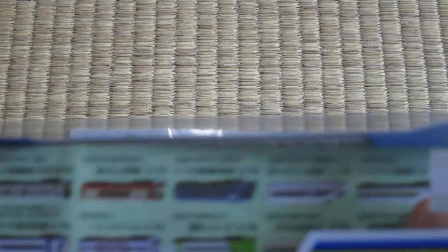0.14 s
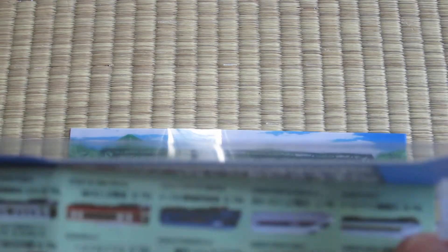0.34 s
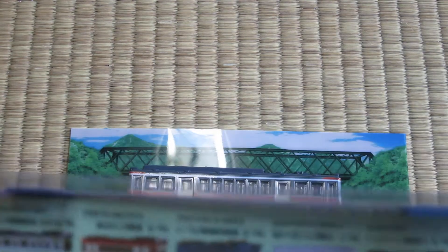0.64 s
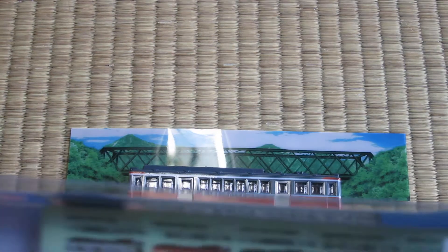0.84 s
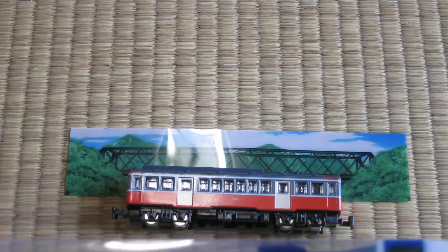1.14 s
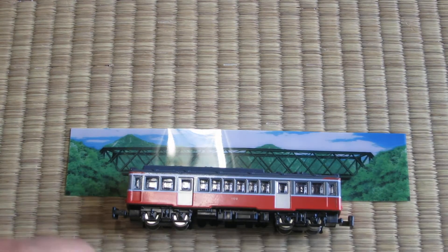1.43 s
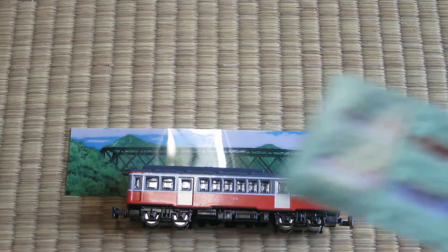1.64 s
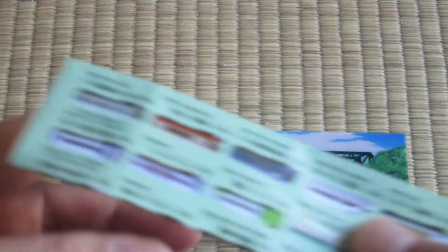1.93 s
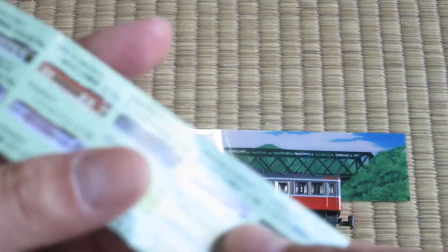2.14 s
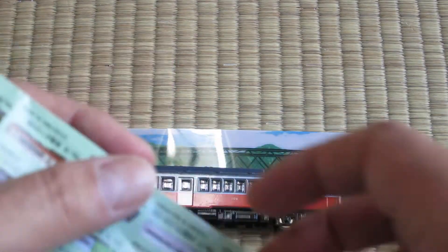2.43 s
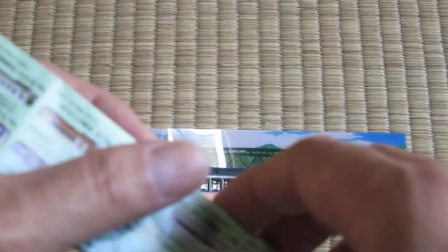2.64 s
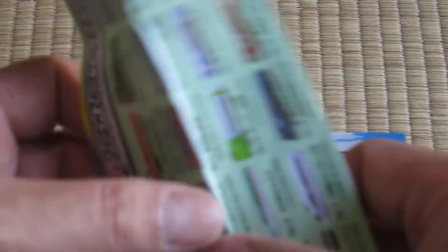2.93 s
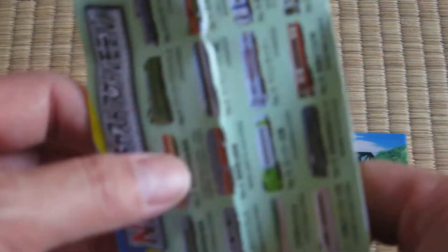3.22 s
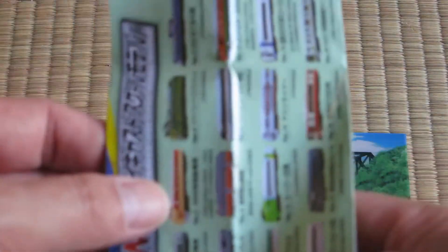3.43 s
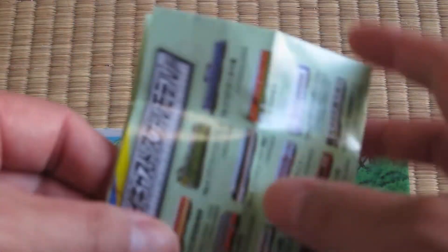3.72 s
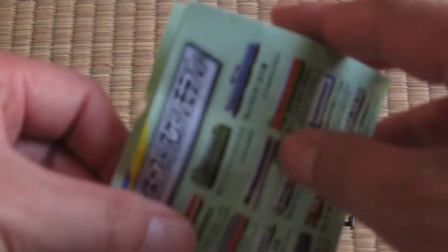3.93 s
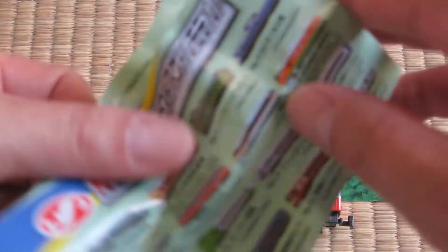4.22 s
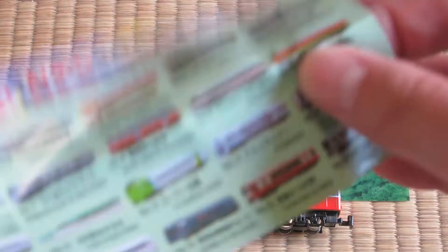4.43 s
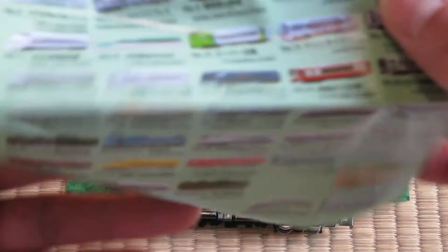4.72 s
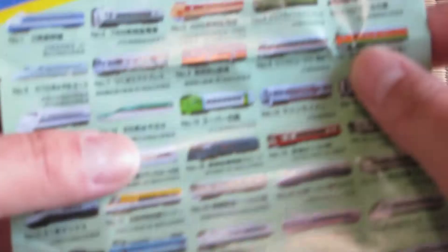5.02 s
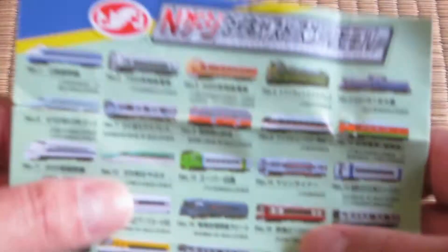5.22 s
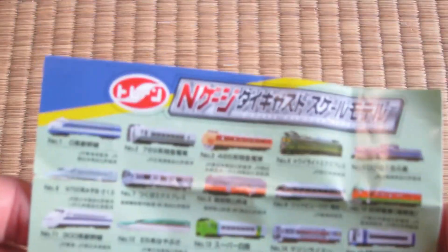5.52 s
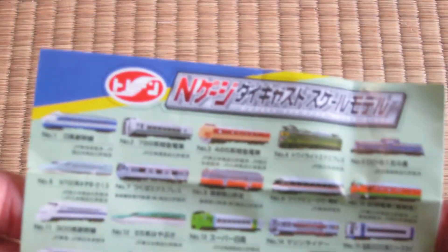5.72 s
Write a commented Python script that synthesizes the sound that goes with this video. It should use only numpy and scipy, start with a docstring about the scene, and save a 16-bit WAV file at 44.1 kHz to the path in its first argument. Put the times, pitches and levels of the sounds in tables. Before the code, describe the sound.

Close-up handling: a thin box rattles and is set down, then a creased paper sheet hisses, crinkles and crackles open in a quiet room.

```python
"""Unfolding a glossy leaflet

Hands close to a small stereo microphone slide a folded leaflet out of a thin box, put the box down and unfold the sheet.
Sliding is a dense rain of tiny random slips: in the box it rings the hollow walls, on the open sheet it hisses bright.
Knocks, dull tocks off to the right and crease snaps are short bursts of noise that ring resonances.
A quiet matted room hums underneath and adds a short dull tail."""
import sys
import numpy as np
from scipy import signal
from scipy.fft import rfft, irfft
from scipy.io import wavfile
from scipy.ndimage import uniform_filter1d

SR = 44100
rng = np.random.default_rng(int(sys.argv[2]) if len(sys.argv) > 2 else 0)


def master(y):
    """Save y as 16-bit WAV."""
    cut = np.clip(np.atleast_2d(y).T, -1, 1)
    pcm = np.round(cut * 32767)  # scale
    wavfile.write(sys.argv[1], SR, pcm.astype(np.int16))


N = 259043

# bright cracking resonances of box and creases: (frequency [Hz], width [Hz], relative level [dB])
CRACK_MODES = [(4330, 880, 9), (6800, 7900, 11.5), (10300, 1500, -33)]

WIDE_HZ, WIDE_DB = 8600, -6  # above this the two ports hear partly different sound
FADE_DB = 20  # a stroke gains this much over its rise and loses it over its fall
SCATTER_DB = -0.5  # each blow lands a little aside
SOFTER_PER_DB = 0.16  # dB by which the rise lengthens for each dB that a blow is weaker than -20 dB
RISE_SHARE = 0.29  # part of the contact time that adds to the rise
TINT_DB = 3  # spread of each resonance from blow to blow


def undb(db):
    """Turn decibels into gain."""
    return 10 ** (np.asarray(db) / 20)


def unit(x):
    """Scale to an rms of 1."""
    return x / np.sqrt(np.mean(x ** 2))


def response(modes):
    """Ring of a body: steep resonances whose powers add, made causal through the cepstrum of the log gain."""
    f = np.maximum(np.arange(1025) * SR / 2048, 1)
    power = 0
    for hz, width, db in modes:
        detuning = (f ** 2 - hz ** 2) / (f * width)
        power = power + undb(2 * db) / (1 + detuning ** 2) ** 2
    cepstrum = irfft(np.log(power) / 2)
    # folding the second half onto the first leaves no sound before the blow
    fold = np.r_[1, np.full(1023, 2.), 1, np.zeros(1023)]
    return irfft(np.exp(rfft(cepstrum * fold)))


def ring(x, modes):
    """Pass both channels through a ringing body."""
    return signal.oaconvolve(x, response(modes)[None], axes=1)[:, :x.shape[1]]


def ports(mid, side, wide_db=-40):
    """Left and right: alike in the bass unless the source is wide, partly unlike in the treble."""
    high_pass = signal.butter(2, WIDE_HZ, "high", fs=SR, output="sos")
    side = undb(wide_db) * side + undb(WIDE_DB) * signal.sosfilt(high_pass, side)
    return np.array([mid + side, mid - side])


def panned(x, pan_db):
    """Share a sound between the two ports; pan_db is left minus right."""
    return x * undb(np.array([pan_db, -pan_db]).reshape(2, -1) / 2)


def walk(rate):
    """Wander between random levels, rate of them per second; spread near 1."""
    k = int(SR / rate)
    levels = np.repeat(rng.standard_normal(N // k + 1), k)
    return 1.2 * uniform_filter1d(levels, k)[:N]


def slips(per_s, spread_db, flutter_db, flutter_rate):
    """Force of tiny random slips of uneven but bounded size over a steady floor, coming in flurries."""
    size_db = spread_db * np.minimum(rng.exponential(size=N), 3.5)
    size = undb(size_db) * (rng.random(N) < per_s / SR)
    return (uniform_filter1d(size, size=12) + 0.21) * undb(flutter_db * walk(flutter_rate))


def curve(table):
    """Columns of a table at every sample, and a gate that is open inside its time span."""
    s, *columns = np.transpose(table)
    t = np.arange(N) / SR
    gate = np.clip(np.minimum(t - s[0] + .02, s[-1] + .02 - t) / .04, 0, 1)
    return gate, [np.interp(t, s, c) for c in columns]


def strokes(table):
    """Gain of each layer over time: every stroke swells and fades evenly in dB, and their powers add."""
    t = np.arange(N) / SR
    shape = []
    for s, rise, fall, *_ in table:
        distance = np.maximum((s - t) / rise, (t - s) / fall)
        shape.append(undb(-2 * FADE_DB * distance))  # twice the dB: power
    return np.sqrt(undb(2 * np.array(table)[:, 3:].T) @ shape)


def patchy(force, modes, patchy_db, rate, wide_db=-40, gains=1):
    """Noise scaled by the force drives each resonance apart, so each swells and fades on its own."""
    parts = []
    for mode in modes:
        noise = rng.standard_normal((2, N))
        drive = ports(*(force * undb(patchy_db * walk(rate)) * noise), wide_db)
        parts.append(ring(drive, [mode]))
    parts = np.array(parts)
    gains = np.reshape(gains, (-1, 1, N) if np.ndim(gains) else ())
    return np.sum(parts * gains, axis=0) / np.std(parts.sum(0))


def bursts(rows, layers, tail, creak, creak_ms, rise_ms, pan_db, wide_db=-40):
    """Each row is a noise burst: a creak builds up, gives way, dies and rings every layer to its own peak."""
    lead, length = 600, 3600  # samples of creak before the blow, and of the whole burst
    out = np.zeros((2, N + length))
    t_ms = (np.arange(length) - lead) * 1000 / SR
    noises = rng.standard_normal((len(rows), 2, length))
    tints = rng.standard_normal((len(rows), 8))
    for row, noise, tint in zip(rows, noises, tints):
        s, *layer_db, ms = row
        bodies = layers(row)
        strongest_db = max(layer_db[:len(bodies)])
        rise = rise_ms * undb(-SOFTER_PER_DB * (strongest_db + 20)) + RISE_SHARE * ms
        after = np.maximum(t_ms - rise, 0) / max(ms, .3)
        build_up = creak * np.exp(np.minimum(t_ms, 0) / creak_ms)
        swell = np.maximum(np.clip(t_ms / rise, 0, 1), build_up)
        push = ports(*noise, wide_db) * swell
        hit = 0
        for k, (modes, db) in enumerate(zip(bodies, layer_db)):
            # later layers in the list die sooner
            fall = np.exp(-after * (1 + 0.24 * k)) + tail * np.exp(-after / 4)
            # every blow weights the resonances anew
            tinted = [(hz, width, level + TINT_DB * z) for (hz, width, level), z in zip(modes, tint)]
            part = ring(push * fall, tinted)
            hit = hit + undb(db) * part / np.abs(part.mean(0)).max()
        start = int(s * SR)
        out[:, start:start + length] += panned(hit, pan_db + SCATTER_DB * tint[-1])
    return out[:, lead:N + lead]


def hum():
    """Room hum and microphone hiss are shaped noise, plus one narrow band, all wavering a little."""
    # spectrum of hum and hiss: (frequency [Hz], relative level per Hz [dB])
    hum_spectrum = np.array([(18, -21), (30, -9.5), (52, -2), (79, -10.5), (124, -2), (259, -6.5),
                             (374, -11.5), (415, -7), (600, -12.5), (760, -13), (937, -12), (2060, -20),
                             (6900, -31), (16000, -37)])
    # likeness of the two ports: (frequency [Hz], left-right correlation [-1 to 1])
    hum_likeness = np.array([(30, 0.44), (60, 0.18), (290, -0.56), (1410, -0.61), (3100, -0.38),
                             (6820, 0.036), (15000, -0.56)])
    # the narrow band: (frequency [Hz], width [Hz], relative level [dB])
    band_modes = [(1282, 180, 0)]
    hum_db, band_db = -47, -59
    log_f = np.log(np.maximum(np.arange(N // 2 + 1) * SR / N, 1))
    gain = undb(np.interp(log_f, np.log(hum_spectrum[:, 0]), hum_spectrum[:, 1]))
    alike = np.interp(log_f, np.log(hum_likeness[:, 0]), hum_likeness[:, 1])
    alike = np.clip(alike, -.95, .95)
    noise = rng.standard_normal((2, N)) * undb(2.1 * walk(5.9))
    mid, side = rfft(noise) * gain * np.sqrt([1 + alike, 1 - alike])
    wide_hum = unit(irfft(np.array([mid + side, mid - side]), N))
    band = unit(ring(rng.standard_normal((2, N)), band_modes))
    return undb(hum_db) * wide_hum + band * undb(band_db + 0.92 * walk(4.9))


def box():
    """The sheet's slips ring the hollow box as it slides out; the box also gets knocked and set down."""
    # sheet dragging out: (time [s], level in the walls [dB], level of the hiss [dB], level of the boom [dB])
    drag_levels = [(0.0, -42.5, -51, -47), (0.11, -35.5, -38, -40), (0.285, -57, -61, -63),
                   (0.387, -49, -51.5, -54), (0.535, -56.5, -54, -51.5), (0.603, -43, -45, -55),
                   (0.66, -52, -50.5, -47), (0.726, -46.5, -49, -52), (0.848, -39, -41, -58),
                   (0.974, -37.5, -37.5, -53.5), (1.025, -28, -31.5, -45), (1.074, -24.5, -27.5, -35.5),
                   (1.173, -36, -36.5, -56), (1.231, -51, -57, -53), (1.3, -71, -78, -62)]
    # box shuffling on the mat once set down:
    # (time of strongest [s], rise [s], fall [s], walls [dB], hiss [dB], boom [dB])
    mat_shuffles = [(1.4, 0.032, .03, -75, -56, -75), (1.447, 0.011, 0.1, -43, -54, -45.5),
                    (1.668, 0.024, 0.23, -49.5, -59, -47.5), (1.752, 0.11, 0.037, -44.5, -68, -44.5)]
    # knocks and slips: (time [s], boom peak [dB], walls peak [dB], crack peak [dB], contact [ms])
    knock_rows = [(0.014, -60, -40, -34.5, 4.1), (0.05, -31, -19, -24.5, 3.7), (0.085, -61, -32, -23, 3.1),
                  (0.098, -31, -18, -21.5, 3.4), (0.112, -27.5, -22, -42, 1.5),
                  (0.126, -39.5, -38, -26.5, 8.7), (0.175, -60, -45, -34, 3.5), (0.554, -39, -28, -33, 3),
                  (0.595, -28, -16, -15.5, 0.63), (0.702, -51, -34.5, -35.5, 2.5),
                  (0.748, -41, -36, -44, 1.6), (0.769, -61, -33, -32, 5.1), (0.843, -32, -36, -29, 2.7),
                  (0.949, -42, -26, -42, 2.3), (1.03, -40, -22, -24, 2), (1.035, -34, -13, -13, 2.2),
                  (1.043, -42, -13, -17, 6.1), (1.06, -27, -10, -8, 1.8), (1.072, -25, -4, -6.5, 2.3),
                  (1.079, -16, -27, -7, 2.5), (1.101, -28.5, -4, -5.5, 1.9), (1.112, -29, -13.5, -25, 4),
                  (1.165, -57, -36, -18.5, 4.1), (1.195, -58, -24.5, -18, 1.46),
                  (1.251, -37.5, -36, -32, 1.2), (1.272, -60, -60, -34.5, 1.4), (1.347, -69, -39.5, -62, 2),
                  (1.435, -36, -20.5, -23.5, 5.5), (1.457, -50, -28, -32, 1.4), (1.496, -60, -37, -43, 3.8),
                  (1.519, -56, -55, -46, 2.7), (1.642, -65, -51, -41, 2.1), (1.658, -35, -16.5, -24, 3.6),
                  (1.665, -45, -25, -36, 3.8), (1.679, -33, -52, -48, 3.1), (1.71, -35, -26.5, -32, 2.5),
                  (1.732, -40, -25.5, -33.5, 3.8), (1.782, -59, -46, -46, 2.6), (1.89, -63, -48, -43, 3.3)]
    # low thud of the box in the hand: (time [s], peak [dB], contact [ms])
    thud_rows = [(.118, -34, 15)]
    # resonances of the box walls: (frequency [Hz], width [Hz], relative level [dB])
    wall_modes = [(916, 242, 8), (1500, 470, -2.5), (1993, 153, -3), (2310, 330, -4), (2975, 620, -11.5),
                  (1550, 810, -3), (636, 380, -22)]
    # bright resonances of the sliding hiss: (frequency [Hz], width [Hz], relative level [dB])
    squeak_modes = [(3240, 170, 12), (4405, 82, 11.5), (5030, 160, 8.5), (3960, 4300, 5.5),
                    (5640, 9700, 0.5), (8000, 1700, 0.5), (10500, 4100, -3)]
    # low resonances of the hollow box: (frequency [Hz], width [Hz], relative level [dB])
    boom_modes = [(271, 74, -6.5), (327, 264, -5)]
    # resonance of the thud: (frequency [Hz], width [Hz], relative level [dB])
    thud_modes = [(154, 35, 0)]
    drag_pan_db, knock_pan_db = 0, -0.3  # left minus right
    gate, layer_db = curve(drag_levels)
    gains = gate * undb(layer_db) + strokes(mat_shuffles)
    scrape = slips(2500, 2.8, 1.5, 59.35)
    drag = 0
    for gain, modes in zip(gains, (wall_modes, squeak_modes, boom_modes)):
        drag = drag + gain * patchy(scrape, modes, patchy_db=2.2, rate=25.27)
    knocks = bursts(knock_rows, lambda row: (boom_modes, wall_modes, CRACK_MODES), tail=0.38,
                    creak=0.022, creak_ms=2.0, rise_ms=0.49, pan_db=knock_pan_db)
    thuds = bursts(thud_rows, lambda row: (thud_modes,), tail=0.087,
                   creak=.02, creak_ms=1.5, rise_ms=4.1, pan_db=knock_pan_db)
    return panned(drag, drag_pan_db) + knocks + thuds


def tocks():
    """Dull tocks off to the right: short noise bursts ring a few middle resonances."""
    # the blows: (time [s], peak [dB], contact [ms])
    tock_rows = [(0.486, -26, 3.5), (1.282, -32.5, 1.5), (1.795, -23.5, 1.7), (2.653, -29, 4.3),
                 (2.903, -44, 2.8), (3.28, -43, 4)]
    # resonances: (frequency [Hz], width [Hz], relative level [dB])
    tock_modes = [(1334, 600, 22), (1730, 1500, -22), (2240, 1160, -29)]
    return bursts(tock_rows, lambda row: (tock_modes,), tail=0.11,
                  creak=.03, creak_ms=1.5, rise_ms=0.19, pan_db=-14.5)


def stroked_sheet(flap_modes):
    """Slips of skin hiss on glossy paper; slower buckling of the whole sheet rustles and flaps."""
    # finger strokes: (time of strongest [s], rise [s], fall [s], sheen [dB], scuff [dB], rustle [dB],
    # tilt of the sheen [dB per octave])
    finger_strokes = [(2.1, 0.026, 0.21, -51.5, -63, -65, -3), (2.175, 0.086, 0.34, -48, -53, -56, 10),
                      (2.444, 0.026, .035, -49.5, -51, -54, -7), (2.53, 0.046, 0.27, -51, -51, -58, -5),
                      (2.72, 0.064, 0.14, -41.5, -41, -48.5, -1), (2.79, 0.16, .07, -45, -61, -50, 0),
                      (2.878, 0.017, 0.083, -45, -47, -53, 12), (2.927, 0.053, 0.049, -36, -55, -44, 5),
                      (3.03, 0.16, 0.11, -46.5, -53, -49, 7), (3.16, 0.077, 0.082, -45.5, -53, -46.5, 8),
                      (3.281, 0.14, 0.17, -54.5, -58, -55, 7), (3.552, 0.082, 0.022, -46, -53, -50, 12),
                      (3.708, 0.16, 0.088, -56, -68, -54, -3), (3.87, 0.027, 0.086, -34, -35, -42.5, 2),
                      (3.97, 0.11, 0.16, -45, -45.5, -47, -3), (4.045, 0.089, 0.07, -40.5, -42.5, -43, 2),
                      (4.111, 0.029, 0.092, -42, -42, -42.5, -1), (4.2, 0.13, 0.14, -43, -56, -42, 4),
                      (4.322, 0.17, .15, -34.5, -37.5, -35.5, -6),
                      (4.424, 0.099, 0.015, -31.5, -40, -41.5, 13), (4.552, 0.033, 0.032, -67, -66, -52, 1),
                      (4.602, 0.019, 0.019, -40.5, -48.5, -51, 14), (4.673, 0.0092, 0.03, -44, -53, -64, 7),
                      (4.741, .02, 0.041, -44.5, -54, -55, -2), (4.837, .08, 0.047, -38.5, -49, -36.5, -1),
                      (4.997, 0.41, 0.19, -49.5, -56, -52, 2), (5.06, 0.03, 0.072, -44, -47.5, -44, -9),
                      (5.14, 0.066, 0.12, -48.5, -55, -44.5, 1), (5.19, 0.12, .03, -47.5, -60, -44.5, -4),
                      (5.266, 0.023, 0.034, -44.5, -54, -66, 3), (5.352, .08, 0.13, -48, -53, -51.5, -5)]
    # low flapping of the sheet: (time [s], level [dB])
    flap_levels = [(1.95, -62), (2.2, -58.5), (2.7, -53.5), (3.4, -52.5), (3.85, -50), (4.14, -44.5),
                   (4.4, -48.5), (4.5, -59), (4.67, -55), (4.84, -49.5), (5.0, -53.5), (5.18, -49.5),
                   (5.28, -78), (5.352, -51), (5.474, -64), (5.87, -54.5)]
    # resonances of the bright hiss: (frequency [Hz], width [Hz], relative level [dB])
    sheen_modes = [(6900, 3100, -2.5), (8300, 3700, -1), (10360, 1800, -3.5), (12140, 5400, -3.5)]
    # resonances of the rougher rub: (frequency [Hz], width [Hz], relative level [dB])
    scuff_modes = [(3840, 740, 1.2), (4230, 3900, 1), (5540, 2900, -1.3)]
    # resonances of the rustling: (frequency [Hz], width [Hz], relative level [dB])
    rustle_modes = [(1210, 800, 1.5), (1900, 3000, 5), (2640, 3100, -6)]
    hold_s, hold_db = 1.98, (-62, -66.5, -66)  # from then on fingers never quite rest: sheen, scuff, rustle
    sheet_wide_db = -13  # the open sheet spans both ports, so its low sounds differ left and right
    gate, (flap_db,) = curve(flap_levels)
    held = np.clip((np.arange(N) / SR - hold_s) / 0.14, 0, 1) * undb(hold_db)[:, None]
    rough, lean = [], []
    for s, rise, fall, sheen_db, scuff_db, rustle_db, tilt in finger_strokes:
        rough.append((s, rise, fall, scuff_db, rustle_db))
        # each stroke leans towards the upper or lower resonances of the sheen
        tilted_db = [sheen_db + tilt * np.log2(hz / 8500) for hz, _, _ in sheen_modes]
        lean.append((s, rise, fall, *tilted_db))
    scuff_gain, rustle_gain = np.hypot(strokes(rough), held[1:])
    sheen_gains = np.hypot(strokes(lean), held[0])
    rub = slips(5600, 2.6, 0.38, 39)
    crinkle = slips(900, 6.1, 2.03, 45)
    sheen = patchy(rub, sheen_modes, 2.1, 12, gains=sheen_gains)
    scuff = scuff_gain * patchy(rub + crinkle, scuff_modes, 2.5, 19)
    rustle = rustle_gain * patchy(crinkle, rustle_modes, 3.0, 18, sheet_wide_db)
    flap = gate * undb(flap_db) * patchy(crinkle, flap_modes, 1.6, 25, sheet_wide_db)
    return panned(sheen + scuff + rustle + flap, 0.2)


def crease_snaps(flap_modes):
    """Creases buckle through: each snap flaps low, pops at its own pitch and cracks bright."""
    # the snaps: (time [s], pop peak [dB], crack peak [dB], pop frequency [Hz], buckling [ms])
    snap_rows = [(2.016, -50, -39.5, 1233, 1.4), (2.036, -41, -46, 4000, 1.5), (2.076, -43, -40, 1260, 1.8),
                 (2.254, -31.5, -27.5, 3120, 6.4), (2.293, -39, -46, 4200, 2), (2.392, -39, -36, 1280, 3.4),
                 (2.412, -46, -47, 4000, 1.5), (2.517, -47, -35, 872, 5), (2.708, -40, -47, 3430, 4),
                 (2.812, -31.5, -40, 3050, 2.9), (2.83, -42, -30, 797, 4.5),
                 (2.921, -26.5, -17.5, 2980, 2.6), (2.957, -40, -35, 1270, 2.8),
                 (2.966, -28, -22, 664, 2.9), (2.975, -27, -29, 1310, 1.7), (3.048, -33, -35, 770, 1.7),
                 (3.159, -39, -28.5, 1090, 6.1), (3.49, -38, -32, 1400, 2.5), (3.515, -35, -42, 1190, 4),
                 (3.556, -33, -34, 734, 6.9), (3.631, -34.5, -35.5, 1280, 3),
                 (3.662, -29.5, -30, 1300, 1.54), (3.714, -39, -35.5, 1660, 5.3),
                 (3.748, -37, -33, 794, 8.3), (3.776, -37, -33.5, 1260, 13), (3.797, -30.5, -30, 1550, 14),
                 (3.822, -31, -29, 1280, 12.5), (3.851, -28, -26, 790, 3.4), (3.922, -26, -37, 960, 1.4),
                 (3.951, -29, -26, 1260, 2.1), (4.001, -33, -25.5, 1590, 3.6),
                 (4.016, -16.5, -6.5, 1600, 3.2), (4.06, -23, -31, 895, 1.55), (4.102, -25.5, -21, 3300, 5),
                 (4.118, -25, -22, 3400, 3.1), (4.16, -9.5, -14.5, 3030, 0.89),
                 (4.205, -27, -31, 2510, 1.9), (4.251, -17, -34, 1150, 3.4), (4.267, -17.5, -29, 2400, 3.5),
                 (4.286, -31, -40, 1950, 2.8), (4.401, -14.5, -8.5, 2170, 4), (4.416, -35, -7, 3430, 1.3),
                 (4.428, -34, -16, 3200, 1.8), (4.434, -30, -10.5, 2360, 1.1),
                 (4.456, -20.5, -37, 2290, 1.4), (4.48, -32.5, -47, 875, 0.79), (4.49, -37, -54, 2400, 1.5),
                 (4.539, -35, -58, 1600, 1.5), (4.553, -36, -50, 2400, 1.5), (4.565, -37, -50, 2200, 1.1),
                 (4.6, -34, -38, 1840, 2.4), (4.672, -33, -42, 960, 5.7), (4.736, -58, -29, 770, 3.1),
                 (4.762, -27.5, -26, 940, 4.6), (4.786, -31, -25, 1640, 2.2), (4.792, -20, -49, 1640, 4.6),
                 (4.825, -14, -21.5, 2350, 2.6), (4.845, -38, -20, 3290, 4.9), (4.862, -39, -24, 824, 2.8),
                 (4.909, -31, -42, 1600, 2), (4.916, -23.5, -40, 1940, 1.8), (4.926, -17.5, -27, 704, 1.1),
                 (5.123, -38, -34, 2280, 3.7), (5.288, -39, -54, 600, 1.7), (5.339, -44, -37, 412, 5.2),
                 (5.356, -43.5, -45, 250, 3.6)]
    # flap against a 1 kHz pop; big slack folds pop lower and flap more
    flap_under_db, flap_db_per_octave = -7.5, -8.5
    rows = []
    for s, pop_db, crack_db, hz, ms in snap_rows:
        flap_db = pop_db + flap_under_db + flap_db_per_octave * np.log2(hz / 1000)
        rows.append((s, flap_db, pop_db, crack_db, hz, ms))

    def bodies(row):
        """Flap, pop and crack resonances of one snap."""
        pop_hz = row[-2]
        return flap_modes, [(pop_hz, 1.22 * pop_hz, 0)], CRACK_MODES

    return bursts(rows, bodies, tail=0.033, creak=0.083, creak_ms=8.2, rise_ms=0.25,
                  pan_db=0, wide_db=-17.5)


def leaflet():
    """Fingers stroke the open sheet and its creases snap; both share the low resonances of the paper."""
    # low resonances of the sheet: (frequency [Hz], width [Hz], relative level [dB])
    flap_modes = [(167, 132, -0.5), (328, 246, 3), (672, 520, -3)]
    return stroked_sheet(flap_modes) + crease_snaps(flap_modes)


def room(x):
    """Mats and walls add a short dull tail: decaying noise convolved with the sound."""
    t60_s, tail_db = 0.11, -22
    t = np.arange(int(.3 * SR)) / SR
    decay = np.exp(-np.log(1000) * t / t60_s) * (t > .004)  # silent for the first 4 ms
    tail = ports(*rng.standard_normal((2, len(t)))) * decay
    tail = uniform_filter1d(tail, size=3)  # dulls the treble
    tail = undb(tail_db) * tail / np.sqrt(np.sum(tail ** 2) / 2)
    return x + signal.fftconvolve(x, tail, axes=1)[:, :N]


def scene():
    """Box, tocks and leaflet in the room, over its hum."""
    return room(box() + tocks() + leaflet()) + hum()


def record(dry):
    """The preamplifier rounds the loudest peaks; the microphone fades towards the top, which is then cut."""
    left_treble_db = 2.5  # the left port is brighter than the right
    headroom, top_hz = 1.5, 15900  # drive into the rounding; upper cut
    treble = signal.sosfilt(signal.butter(2, 8000, "high", fs=SR, output="sos"), dry)
    treble_gain = undb(np.array([[.5], [-.5]]) * left_treble_db)
    dry = dry + treble * (treble_gain - 1)
    rounded = np.tanh(headroom * dry) / headroom
    soft = signal.sosfilt(signal.butter(3, 12500, fs=SR, output="sos"), rounded)
    return signal.sosfilt(signal.ellip(12, .2, 100, top_hz, fs=SR, output="sos"), soft)


dry = scene()
out = record(dry)
master(out)
```